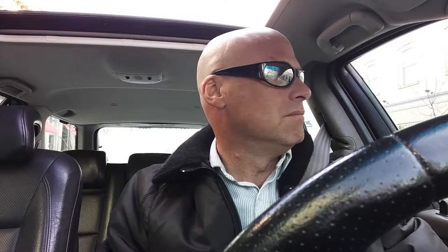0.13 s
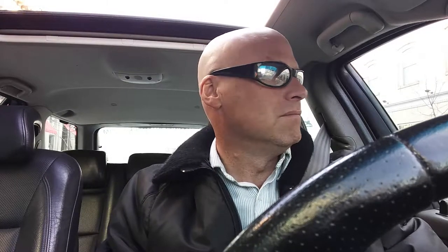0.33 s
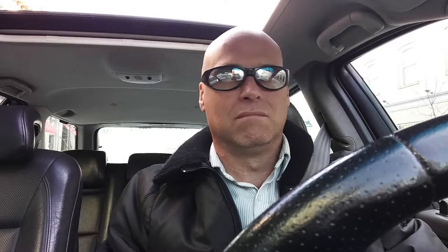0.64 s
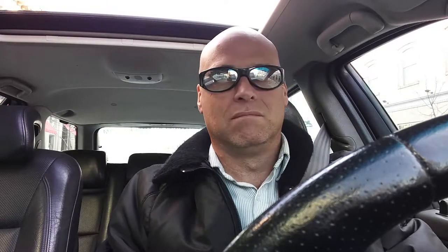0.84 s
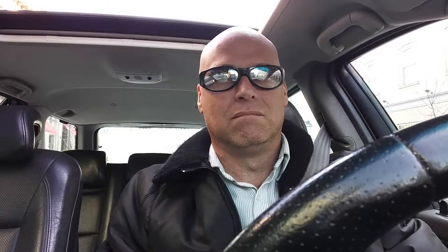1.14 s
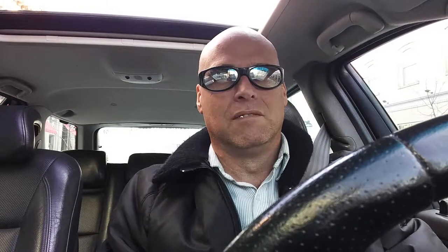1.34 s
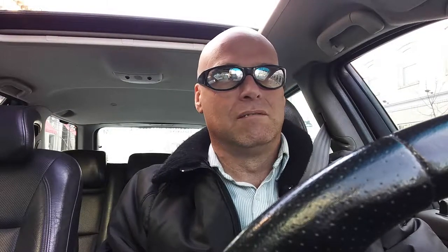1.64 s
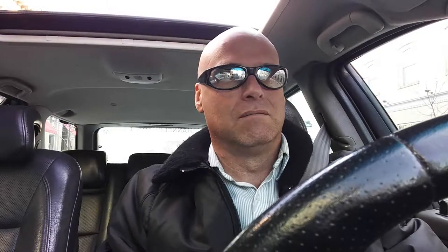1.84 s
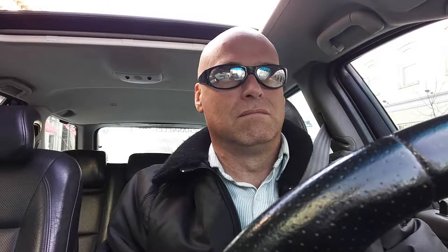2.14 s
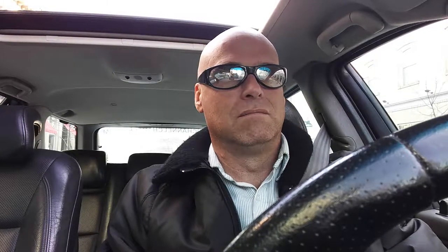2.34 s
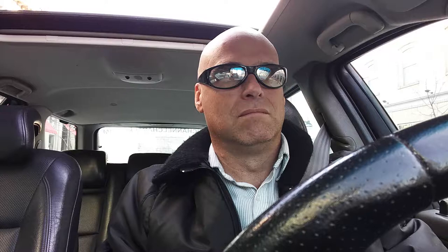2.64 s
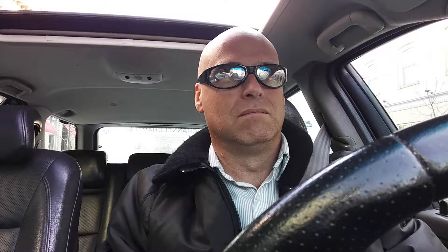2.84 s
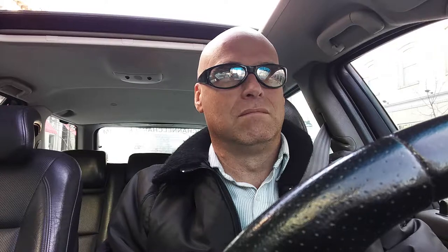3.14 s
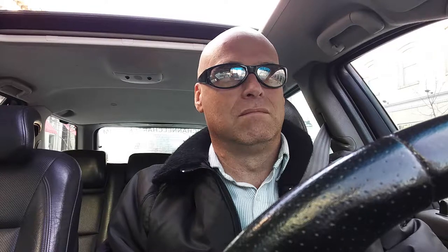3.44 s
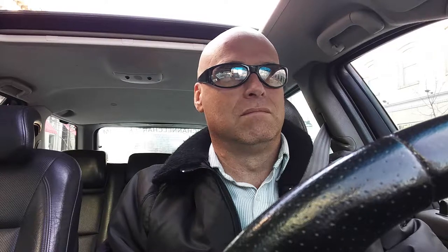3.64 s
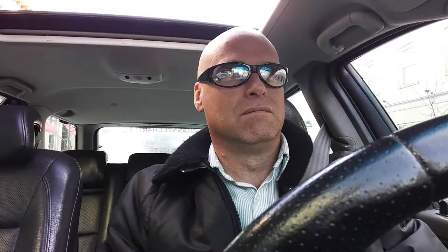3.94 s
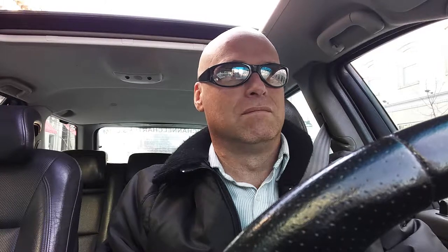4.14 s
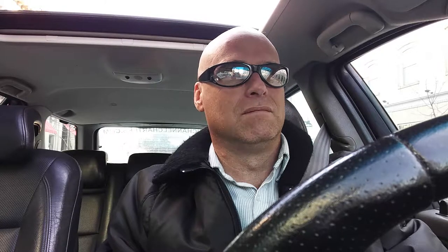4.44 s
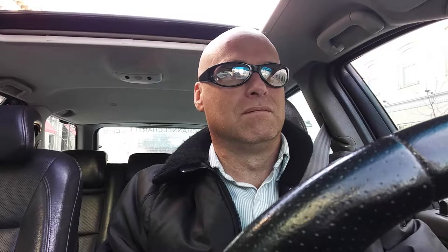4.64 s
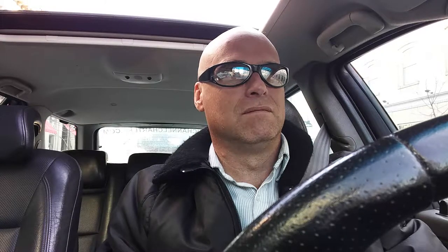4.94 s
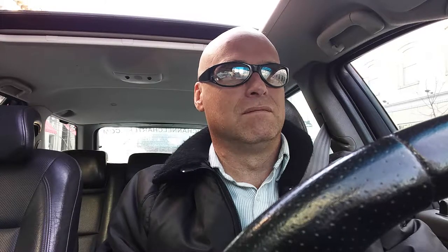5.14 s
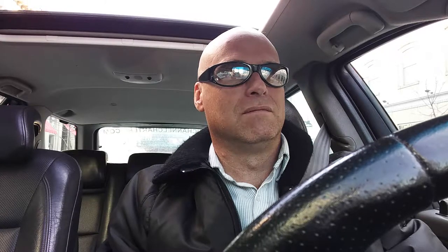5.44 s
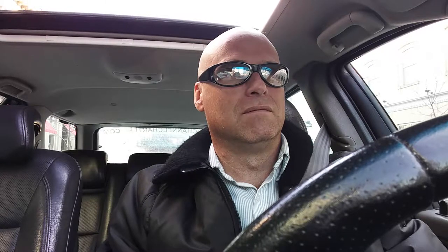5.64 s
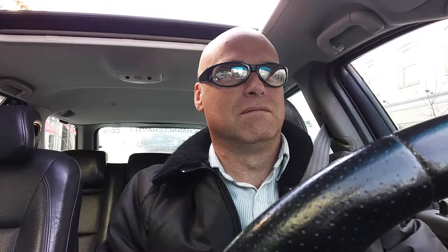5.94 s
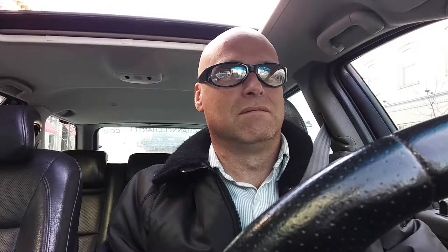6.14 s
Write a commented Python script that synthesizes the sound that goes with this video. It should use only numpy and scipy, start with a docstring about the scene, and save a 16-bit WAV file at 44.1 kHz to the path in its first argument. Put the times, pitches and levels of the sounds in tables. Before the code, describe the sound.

A pneumatic jackhammer is already pounding at 0 s, heard from inside a stationary car with its engine idling. Blows come roughly nineteen per second: a bright, ragged steel clatter mixed with gritty concrete crunch, each answered halfway by a shorter, brighter return knock. Spent air hisses and hollow ports ring between strokes, while low thuds and a dull boom come through the cabin. Around 1.1 s two weaker blows trail off and the hammering stops until about 1.36 s, exposing decaying street echoes, low idle tones and soft distant traffic rumble. It then restarts and runs steadily, with small changes in force and colour; thuds are softer after the restart and firmer around 4.5-5 s. From about 5.6 s the rhythm slows to around sixteen blows per second and grows slightly uneven, still running at 6.3 s. Wide stereo, left side a touch brighter.

```python
"""A pneumatic breaker pounds the road outside a waiting car, pauses once and slows towards the end.
Each blow is a short force pulse that rings the steel chisel, crushes concrete and thumps the cabin.
The piston knocks again on its way back; spent air rings the ports and casing, and the valve hisses.
House fronts return the clatter as decaying noise echoes; the car's engine idles as steady tones
under the shaped noise of distant traffic."""
import sys
import numpy as np
from scipy import signal
from scipy.fft import rfft, irfft
from scipy.io import wavfile
from scipy.ndimage import uniform_filter1d

SR = 44100
rng = np.random.default_rng(int(sys.argv[2]) if len(sys.argv) > 2 else 0)


def master_out(mix):
    """Clip the mix to full scale and print it as 16-bit PCM to the path in sys.argv[1]."""
    frames = np.transpose(np.atleast_2d(mix))
    ceiling = np.clip(frames, -1, 1)
    pcm = np.round(ceiling * 32767).astype(np.int16)
    wavfile.write(sys.argv[1], SR, pcm)


N = 277560  # length in samples


def undb(db):
    """Decibel law: amplitude ratio of a level in dB."""
    return 10 ** (np.asarray(db) / 20)


def unit(x):
    """Normalisation to unit root-mean-square amplitude."""
    return x / np.sqrt(np.mean(x ** 2))


def colour(x, points, lag_s=0.):
    """Linear filtering: (Hz, dB) points weight the spectrum and a linear phase delays it."""
    hz = np.arange(1, x.shape[-1] // 2 + 2) * SR / x.shape[-1]
    point_hz, point_db = np.transpose(points)
    gain = undb(np.interp(np.log(hz), np.log(point_hz), point_db))
    delay = np.exp(-2j * np.pi * hz * lag_s)
    return irfft(rfft(x) * gain * delay, x.shape[-1])


def ring(x, modes, sense=-1):
    """Modal superposition: damped resonators add, neighbours in opposite sense unless sense is 1."""
    out = 0
    for k, (hz, width_hz, db) in enumerate(modes):
        radius = np.exp(-np.pi * width_hz / SR)
        w = 2 * np.pi * hz / SR
        mode = signal.lfilter([1], [1, -2 * radius * np.cos(w), radius * radius], x)
        out = out + sense ** k * undb(db) * np.sin(w) * mode
    return out


def strikes(s, db, rise_s, fall_s):
    """Impulse superposition: every strike is one force pulse of unit area times its gain."""
    marks = np.zeros(N)
    at = np.clip((np.asarray(s) * SR).astype(int), 0, N - 1)
    np.add.at(marks, at, undb(db))
    t = np.arange(4000) / SR
    pulse = np.exp(-t / fall_s) * (1 - np.exp(-t / rise_s))
    return signal.fftconvolve(marks, pulse / pulse.sum())[:N]


def walk(rate):
    """Slow random modulation: levels held for 1 / rate s, then smoothed twice over that time."""
    k = int(SR / rate)
    held = np.repeat(rng.standard_normal(N // k + 1), k)
    return uniform_filter1d(uniform_filter1d(held, k), k)[:N]


def piston():
    """Reciprocating motion: times and levels of all blows and return knocks."""
    # Each row: blow in seconds, steel level in dB, thud over its usual level in dB,
    # pipe ring in dB; all levels are relative.
    strokes = [(0.0324, -17, 0.5, -55), (0.088, -19.5, 2.5, -42.4), (0.141, -20, 0, -49),
               (0.1911, -17, 1, -40), (0.2461, -19, 2, -47), (0.2968, -19, -1.5, -36),
               (0.3488, -17.5, -1, -35), (0.4015, -19, -2, -40), (0.452, -19, 0, -50),
               (0.5075, -19, 0.5, -38), (0.5585, -18.5, -2, -43), (0.612, -18, -2, -35),
               (0.6648, -18.5, -2, -43.8), (0.7195, -19, -1.5, -41), (0.7691, -16.5, -2, -45),
               (0.8273, -19, -5, -41), (0.88, -19.5, 0, -37), (0.9324, -17, -3, -34),
               (0.9834, -18.5, -4, -50), (1.037, -17, -0.5, -41), (1.094, -24, -3.5, -43),
               (1.1722, -27, -3, -48), (1.363, -18.5, 0, -37), (1.4191, -17.5, -2, -36),
               (1.4712, -19, 1, -35), (1.521, -17, 1, -39), (1.5734, -17.5, -1, -42),
               (1.6229, -16.5, 5.5, -33.5), (1.676, -16.5, 4, -43), (1.727, -18, 5, -47),
               (1.779, -17.5, 0.5, -35), (1.8319, -16.5, 2, -49), (1.8836, -18.5, 4.5, -42),
               (1.9367, -17, -3, -38), (1.9868, -18, 2.5, -33), (2.041, -17, -4, -37),
               (2.0938, -17.5, 4, -45), (2.1448, -18, -1, -42), (2.1985, -19.5, 1, -36),
               (2.2496, -16, 1, -37), (2.3027, -18, 2.5, -34.5), (2.355, -19.5, 2, -39),
               (2.4071, -19, 4, -37), (2.4582, -19.5, -1, -32), (2.5129, -18.5, 3, -33),
               (2.566, -17, 2, -32.5), (2.616, -18.5, 0, -33), (2.6698, -19.5, 3, -35),
               (2.7194, -17, 0, -43), (2.7718, -18.5, -2, -32), (2.8238, -18.5, 2, -37),
               (2.8752, -18, 0.5, -38), (2.9278, -18, 4, -33), (2.9744, -18.5, 1.5, -35),
               (3.0296, -17.5, 0.5, -31.5), (3.0845, -17, 1, -33), (3.1331, -17, 1, -39),
               (3.186, -17, 1, -34), (3.2385, -19.5, 2.5, -33.5), (3.291, -17.0, 1.5, -33),
               (3.341, -17, 1, -33), (3.3936, -17.7, 0.5, -44), (3.4436, -18.5, -0.3, -35),
               (3.4951, -17, 2, -51), (3.545, -22, -1, -36), (3.598, -17.5, -1, -33),
               (3.6486, -19, 3.5, -33), (3.7021, -16.5, 0, -54), (3.755, -17.9, 3, -35.5),
               (3.809, -19.5, -1, -37), (3.8609, -21, -1, -31), (3.9124, -19, 0, -31.5),
               (3.963, -19.5, 1, -34), (4.016, -19, 2, -36), (4.07, -20, 2, -33),
               (4.1237, -18.5, -0.5, -53), (4.176, -18, 1, -40.6), (4.2278, -17, 1, -45),
               (4.284, -20, 3, -37), (4.3374, -19.5, -2, -38), (4.391, -20, 1, -37), (4.4464, -19, -3, -36),
               (4.5, -19, -1.5, -37), (4.5548, -19, -3, -38), (4.609, -19, -1.5, -42.3),
               (4.6657, -18, -1, -39), (4.7182, -19.5, -4.5, -38), (4.772, -20, -4, -38),
               (4.8255, -18.5, -1.7, -38), (4.8794, -19, -1.5, -41.5), (4.932, -18.5, -3.5, -43.8),
               (4.988, -17.5, -3, -52), (5.0433, -21, -2.5, -38), (5.099, -20.5, -2.5, -36),
               (5.1554, -21.5, -2.5, -42), (5.211, -20, -2.5, -34), (5.2625, -19.5, -2.5, -44),
               (5.3175, -20, -2.5, -40), (5.3729, -20, 1.5, -49), (5.4269, -19, -1.5, -39),
               (5.483, -20.5, 0, -35), (5.5369, -19, 2.5, -39), (5.5889, -21.3, -2.5, -37),
               (5.654, -20.5, -0.5, -42), (5.7115, -22, -0.5, -35), (5.7768, -21.5, -2, -32),
               (5.838, -19, 0.5, -38), (5.9013, -21, 1, -34), (5.96, -22.5, 0.5, -36),
               (6.0189, -20.5, 3.5, -37), (6.0889, -21, 1, -36), (6.1439, -20.2, 0, -46),
               (6.2216, -19.5, -1, -41), (6.2792, -20.5, 2, -42)]
    # Each row: return knock in seconds, relative level in dB.
    returns = [(0.0666, -26), (0.1211, -19.5), (0.174, -25), (0.226, -23), (0.278, -30), (0.331, -26),
               (0.3822, -29), (0.4351, -20.5), (0.4853, -22.5), (0.5383, -23), (0.5945, -21), (0.6432, -24),
               (0.6967, -24), (0.752, -23), (0.802, -21), (0.859, -26), (0.9101, -24), (0.9646, -21),
               (1.0169, -24), (1.0704, -21.5), (1.124, -33), (1.338, -37), (1.396, -24), (1.451, -32),
               (1.5068, -26), (1.556, -21), (1.6065, -23), (1.6552, -25), (1.7112, -29), (1.7617, -24),
               (1.8139, -30), (1.8635, -24), (1.9202, -21.5), (1.97, -27), (2.0201, -23), (2.0738, -19),
               (2.1266, -20), (2.1812, -18.5), (2.2334, -20), (2.2846, -27.5), (2.337, -21.5),
               (2.3897, -23), (2.4408, -22.5), (2.494, -24), (2.5461, -24), (2.5943, -30), (2.649, -23),
               (2.7, -28), (2.7561, -23), (2.8074, -30), (2.855, -28), (2.9106, -28), (2.962, -26),
               (3.012, -24.5), (3.0633, -27), (3.116, -24), (3.1655, -27), (3.216, -24), (3.269, -24),
               (3.3252, -25), (3.3738, -29), (3.426, -22.5), (3.475, -30), (3.5288, -22.5), (3.578, -22),
               (3.6323, -23), (3.6837, -20.5), (3.7347, -25), (3.791, -22), (3.838, -18.5), (3.892, -22),
               (3.946, -22), (3.9962, -22), (4.0497, -19), (4.1044, -19.5), (4.158, -27), (4.2112, -24),
               (4.2597, -22.5), (4.3185, -23.5), (4.374, -29), (4.4252, -22), (4.48, -23), (4.5324, -25),
               (4.5923, -31), (4.647, -29), (4.6932, -30), (4.7534, -28), (4.806, -24), (4.8586, -26),
               (4.9132, -27.5), (4.9707, -27), (5.02, -24), (5.078, -24.9), (5.1322, -25), (5.1874, -23),
               (5.245, -27), (5.3015, -29.5), (5.3546, -25), (5.407, -25), (5.4593, -25), (5.513, -30),
               (5.5705, -39), (5.6321, -24), (5.6856, -25), (5.759, -25), (5.8168, -24.5), (5.879, -26.5),
               (5.9389, -25), (6.0011, -25), (6.0669, -26), (6.1269, -29), (6.1752, -28), (6.262, -22.7)]
    # Hardness of the ground under the chisel. Each row: time in seconds, bite in dB, 0 the hardest.
    effort = [(0, -9.5), (.5, -4.5), (1.094, -4), (1.175, -27), (1.363, -20), (1.65, -12.5), (1.9, -17),
              (2.5, -15), (3.2, -15.5), (4.0, -14.5), (4.25, -9), (4.75, -2.5), (5.05, -5), (5.5, -8),
              (6.29, -10)]
    s, db, thud_db, pipe_db = np.transpose(strokes)
    back_s, back_db = np.transpose(returns)
    bite_db = np.interp(s, *np.transpose(effort))
    return {"s": s, "db": db, "bite_db": bite_db, "thud_db": thud_db, "pipe_db": pipe_db,
            "back_s": back_s, "back_db": back_db}


def body(hits, modes, db, late_s, return_db, rough, fall_s, push_s=0.000092, sense=-1):
    """Forced resonance: a repeating push plus a rough, noisy share of it rings low modes."""
    s, back_s = hits["s"], hits["back_s"]
    # the return stroke pushes in proportion to its knock
    back_db = np.interp(back_s, s, db - hits["db"]) + hits["back_db"] + return_db
    s = np.append(s + late_s, back_s + late_s)
    db = np.append(db, back_db)
    rattle = strikes(s, db, 0.00067, fall_s) * rng.standard_normal(N)
    push = strikes(s, db, push_s, push_s)
    return ring(push + rough * rattle, modes, sense)


def ring_db(hits, name):
    """Changing coupling: a ring drifts in level as the chisel sinks in; weak blows ring it less."""
    # Each row: relative level at the start in dB, drift in dB per s, change in dB per dB of bite.
    low_rings = {"boom": (-31, 0.036, -0.062), "floor": (-20.5, 0.04, -0.14), "panel": (-22, -0.27, -0.36),
                 "exhaust": (-20, -2.03, 0.013), "casing": (-20, -1.13, 0.51),
                 "whistle": (-42, 1.57, -0.034)}
    start_db, slope, follow = low_rings[name]
    strength_db = 0.11 * (hits["db"] - np.median(hits["db"]))
    return start_db + slope * hits["s"] + follow * hits["bite_db"] + strength_db


def cabin(hits):
    """Structural transmission: ground and glass pass low rings that reach both sides alike."""
    # Modes of thud, door, boom, floor, ground and panel.
    # Each row: frequency in Hz, width in Hz, relative level in dB.
    thud_modes = [(242, 160, -7), (300.6, 92, 0)]
    door_modes = [(310, 119.8, -15)]
    boom_modes = [(124.3, 17, 0)]
    floor_modes = [(152, 23, -3.5), (195.4, 31.3, -3.5)]
    ground_modes = [(57, 18, 0)]
    panel_modes = [(317, 71.5, 4), (371.3, 38, -0.5), (397, 32.6, -6)]
    # The cabin booms only above its lowest resonance. Each row: frequency in Hz, gain in dB.
    bass_cut = [(60, -35), (103, -21), (118, 3.5), (200, -3)]
    # Shudder through the ground. Each row: time in seconds, relative level in dB.
    shudder_points = [(.1, -30), (.45, -32), (.9, -43), (1.35, -26), (1.9, -37), (2.3, -44), (2.8, -37),
                      (3.15, -32), (3.5, -24.5), (3.8, -29), (4.3, -29), (4.6, -26), (5.0, -27), (5.5, -28),
                      (5.85, -30), (6.2, -24)]

    thud_db = hits["bite_db"] + hits["thud_db"] - 35
    thud = body(hits, thud_modes, thud_db, late_s=-0.0032, return_db=-6, rough=0.5, fall_s=0.006)
    # two passes of the door resonance make the thud swell in and die quickly
    thud = ring(ring(thud, door_modes), door_modes)
    boom = body(hits, boom_modes, ring_db(hits, "boom"), late_s=0.0012, return_db=-5,
                rough=14.0, fall_s=0.039, push_s=0.00039)
    floor = body(hits, floor_modes, ring_db(hits, "floor"), late_s=-0.0025, return_db=5.5,
                 rough=11.0, fall_s=0.025, push_s=0.00044)
    shudder_db = np.interp(hits["s"], *np.transpose(shudder_points)) + 8.5
    shudder = body(hits, ground_modes, shudder_db, late_s=0.00042, return_db=-12,
                   rough=1.7, fall_s=.02, push_s=0.00059)
    panel = body(hits, panel_modes, ring_db(hits, "panel") + hits["thud_db"], late_s=0.0017,
                 return_db=-13.5, rough=3.6, fall_s=0.0064, push_s=0.00013)
    return thud + colour(boom + floor, bass_cut) + shudder + panel


def steel(s, db, span=1, db_all=44, bounces=4):
    """Impact excitation: a chattering contact force drives chisel modes, broken concrete and air."""
    # Chisel modes. Each row: frequency in Hz, width in Hz, relative level in dB,
    # drift in dB per s as the chisel sinks in.
    chisel_modes = [(2330, 90, -22, .5), (2900, 200, 0, -.7), (4155, 80, -11, 0), (4510, 100, -9, 0),
                    (4920, 130, -10, 0), (5765, 100, -9, 1.1), (6340, 180, -4, .3), (6630, 140, -3, 0),
                    (7200, 150, -4, .2), (7585, 100, 1, -.8), (8260, 200, 5, -.2), (8800, 140, -2, 0),
                    (9495, 120, -5, .2), (10000, 110, -9, .6), (10550, 160, -5, .4), (10950, 120, -7, 0),
                    (11450, 140, -6, .3), (12000, 130, -7, 0), (12350, 170, -5, -.3), (12900, 220, -7, -.5),
                    (13700, 180, -14, 0)]
    # Noise of concrete and air. Each row: frequency in Hz, relative level in dB per Hz.
    crack_points = [(880, -16), (1500, -18), (2130, -7.5), (2670, -23.5), (3000, -0.5), (5190, -6.5),
                    (8540, -4), (11800, -1), (14800, -16.5), (15700, -52)]
    # The first snap of the concrete is thinner than the hiss after it.
    # Each row: frequency in Hz, gain in dB.
    snap_points = [(1500, -7), (2500, -1.5), (3500, -1.5)]

    # the loose chisel bounces in its chuck around every strike
    late, size = rng.random((len(s), 2, bounces)).transpose(1, 0, 2)
    bounce_s = s[:, None] - .0015 + 0.0137 * span * late
    bounce_db = db[:, None] - 9.5 - 6 * size - 5 * late
    contact = strikes(s, db, 0.0019 * span, 0.0045 * span)
    contact = contact + strikes(bounce_s.ravel(), bounce_db.ravel(), 0.000053, 0.00085)

    # the drive of every mode flickers on its own
    t = np.arange(N) / SR
    chisel = 0
    for hz, width_hz, mode_db, slope in chisel_modes:
        drive_db = 5 * np.tanh(.7 * walk(40)) + slope * t
        drive = contact * undb(drive_db) * rng.standard_normal(N)
        chisel = chisel + ring(drive, [(hz, width_hz, mode_db)])
    chisel = chisel * undb(-27)

    snap = colour(unit(colour(rng.standard_normal(N), crack_points)), snap_points)
    crack = snap * contact * undb(-7.5)
    hiss = unit(colour(rng.standard_normal(N), crack_points))
    air = hiss * strikes(s, db, 0.0068 * span, 0.0065 * span) * undb(-0.5)
    return (chisel + crack + air) * undb(db_all)


def breaker(hits, leak_db=50):
    """Impact and turbulence: blows, brighter return knocks, and valve hiss while the piston works."""
    # The head is small and rings higher. Each row: frequency in Hz, gain in dB.
    return_tilt = [(2500, -24), (5000, -7.5), (8000, -7), (13000, 2)]
    # Valve hiss. Each row: frequency in Hz, relative level in dB per Hz.
    leak_points = [(3000, -9), (8000, -2.5), (12000, -5.5), (14500, -5.5), (15700, -23)]
    blows = steel(hits["s"], hits["db"])
    # the return knock is shorter than the blow
    knocks = colour(steel(hits["back_s"], hits["back_db"], span=.42), return_tilt)
    # averaged over about one stroke, the pressure is steady
    pressure = uniform_filter1d(strikes(hits["s"], hits["db"], 0.017, 0.052), size=SR // 19)
    hiss = unit(colour(rng.standard_normal(N), leak_points))
    leak = hiss * pressure * undb(leak_db + 1.2 * walk(60))
    return blows + knocks + leak


def drift(x):
    """Time-varying spectrum: overlapping bands swell, fade and flicker, alike at both sides."""
    # Each row: band centre in Hz, gain at the start in dB, drift in dB per s,
    # gain in dB added as the breaker slows.
    bands = [(3160, -0.4, 0.05, -3), (4250, 1.53, -0.19, 3), (5150, 0.8, 0.51, 0.5),
             (6000, -1.5, 0.92, -3.5), (7330, 0.96, 1.23, -1), (8730, 2, -0.5, -1.5),
             (8700, 2.5, -0.05, 4.5), (10340, -1.5, 0.39, 2.5), (11750, -1, 0.5, -0.5)]
    # Start and end of the slowing, in seconds.
    slows_s = (5.6, 5.84)
    centre, start_db, slope, slow_db = np.transpose(bands)
    log_hz = np.log(np.arange(1, N // 2 + 2) * SR / N)
    t = np.arange(N) / SR
    slowed = np.interp(t, slows_s, [0, 1])
    spectrum = rfft(x)
    shares = np.eye(len(bands))
    flicker = np.array([walk(40) for _ in bands])
    # with the mean over the bands removed, the colour changes but the strength stays
    flicker_db = 2.2 * (flicker - flicker.mean(axis=0))
    out = 0
    for share, db, k, late_db, own_db in zip(shares, start_db, slope, slow_db, flicker_db):
        weight = np.interp(log_hz, np.log(centre), share)
        band = irfft(spectrum * weight, N)
        out = out + band * undb(db + k * t + late_db * slowed + own_db)
    return out


def exhaust(hits):
    """Cavity resonance: spent air rings the breaker's ports and casing just after each stroke."""
    # Modes of exhaust, casing, pipe and whistle.
    # Each row: frequency in Hz, width in Hz, relative level in dB.
    exhaust_modes = [(608, 42, 0), (714, 40, 1.5)]
    casing_modes = [(870, 120, 0), (1010, 90, -1)]
    pipe_modes = [(1156, 85, 0)]
    whistle_modes = [(1460, 80, 4)]
    ports = body(hits, exhaust_modes, ring_db(hits, "exhaust"), late_s=0.00893, return_db=-7,
                 rough=11.4, fall_s=0.024, push_s=0.00023)
    casing = body(hits, casing_modes, ring_db(hits, "casing"), late_s=0.008, return_db=-16,
                  rough=11.0, fall_s=0.0099, push_s=0.0001)
    pipe = body(hits, pipe_modes, hits["pipe_db"] - 24.5, late_s=0.0041, return_db=-30,
                rough=1.6, fall_s=0.015, push_s=0.000037)
    pipe = ring(pipe, pipe_modes)  # a second pass makes it swell in
    whistle = body(hits, whistle_modes, ring_db(hits, "whistle"), late_s=0.00089, return_db=-25,
                   rough=30.0, fall_s=0.0058, push_s=0.000051)
    return ports + casing + pipe + whistle


def street(x):
    """Reverberation: house-front echoes lose treble first, and treble differs most between sides."""
    # Each row: band centre in Hz, nominal 60 dB decay time in s.
    decay_bands = [(130, .9), (330, .8), (850, .8), (2500, .7), (6500, .5), (12500, .4)]
    # Echo level in each of these bands, in dB.
    echo_db = [2.5, -8.5, 0, -0.5, -2, -10]
    t = np.arange(SR) / SR
    tail = 0
    for (hz, t60), db in zip(decay_bands, echo_db):
        edges = [hz / 1.6, min(hz * 1.6, SR / 2.2)]
        band = signal.butter(3, edges, "bandpass", fs=SR, output="sos")
        fade = np.exp(-np.log(1000) * t / t60 / 2)  # half the decay: it is applied twice
        mid, side = rng.standard_normal((2, SR))
        noise = mid + min(hz / 1660.0, 1) * side * np.array([[1], [-1]])
        spectrum = rfft(noise * fade * np.clip(t / 0.0032, 0, 1))
        # hard flat walls favour no pitch
        echoes = irfft(spectrum / np.abs(spectrum), SR) * fade
        echoes = echoes / np.linalg.norm(echoes, axis=1, keepdims=True)
        tail = tail + undb(db) * signal.sosfilt(band, echoes)
    return signal.fftconvolve(x[None], tail, axes=1)[:, :len(x)]


def idle():
    """Additive synthesis: steady tones of the idling car waver a little in level and phase."""
    # Each row: frequency in Hz, level in dB.
    tones = [(44.5, -42), (70.2, -39.5), (86.5, -35.5), (119, -33.5)]
    t = np.arange(N) / SR
    out = 0
    for hz, db in tones:
        level = undb(db + 0.53 * walk(3.44)) * np.sqrt(2)
        cycles = hz * t + rng.random() + 0.017 * walk(1.93)
        out = out + level * np.sin(2 * np.pi * cycles)
    return out


def traffic(db=-33, side=0.82):
    """Partly correlated noise: a dull, slowly swelling town rumble shared by both sides."""
    # Each row: frequency in Hz, relative level in dB per Hz.
    rumble_points = [(25, -34), (40, -35), (60, -3), (100, -17), (130, -6), (300, -8.5), (420, -9),
                     (510, -24), (690, -18), (1000, -18.5), (2000, -34), (6000, -39), (15000, -49)]
    mid, off = (unit(colour(rng.standard_normal(N), rumble_points)) for _ in range(2))
    swell_db = 1.5 * walk(2)
    return undb(db + swell_db) * (mid + side * off * np.array([[1], [-1]]))


def scene():
    """Superposition: cabin rings, clatter at each side, street echoes, idle and traffic add."""
    hits = piston()
    # the treble leaks in by many gaps, so each side hears mostly its own clatter
    ports = np.array([exhaust(hits) for _ in range(2)])
    blows = np.array([breaker(hits) for _ in range(2)])
    clatter = ports + drift(blows)
    near = cabin(hits) + clatter + 0.19 * clatter[::-1]
    # the breaker is already running: ten strokes put in front still ring and echo
    lead = int(.526 * SR)
    first = int(hits["s"][0] * SR) - 150
    near = np.hstack([near[:, :lead + first], near[:, first:]])
    return (near + street(near[0]))[:, lead:] + idle() + traffic()


def record(dry):
    """Interaural differences: the left port, nearer the open window, is earlier and brighter."""
    # Each row: frequency in Hz, left level minus right in dB.
    left_db = [(100, 0), (300, .5), (700, 1.5), (1500, 0), (2500, .3), (4000, 2.7), (12000, 1.7)]
    right_lag_s, top_hz = .0002, 15750
    # both ends of the spectrum are cut
    dry = signal.sosfilt(signal.butter(4, 42, "highpass", fs=SR, output="sos"), dry)
    left = colour(dry[0], left_db)
    right = colour(dry[1], [(100, 0), (1000, 0)], right_lag_s)
    treble_cut = signal.ellip(10, .2, 80, top_hz, fs=SR, output="sos")
    return signal.sosfilt(treble_cut, np.array([left, right]))


dry = scene()
out = record(dry)
master_out(out)
```